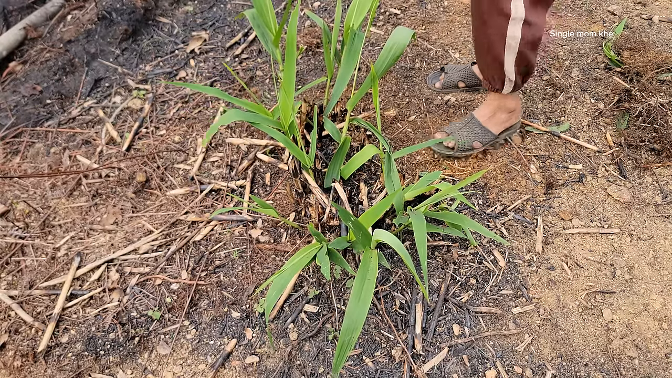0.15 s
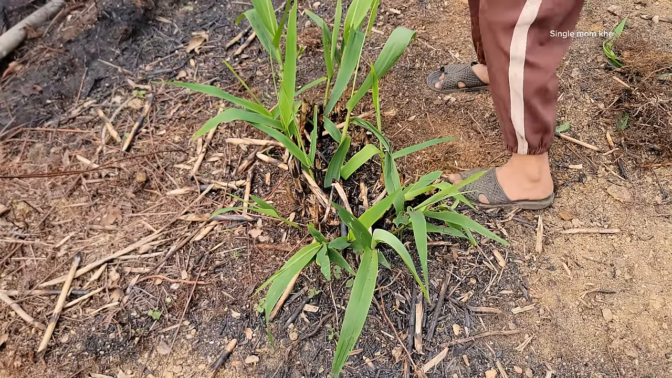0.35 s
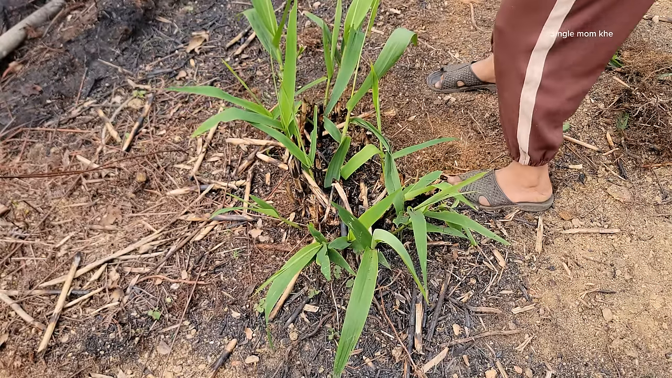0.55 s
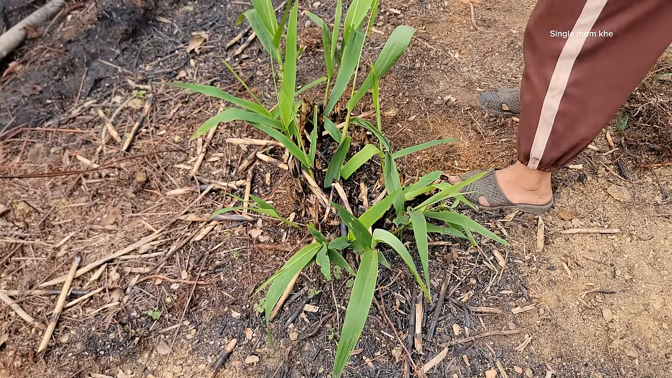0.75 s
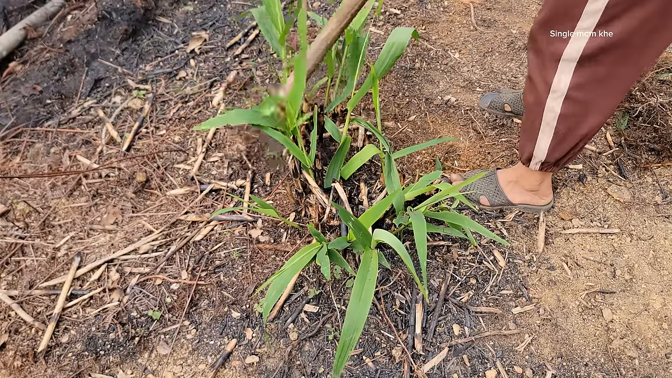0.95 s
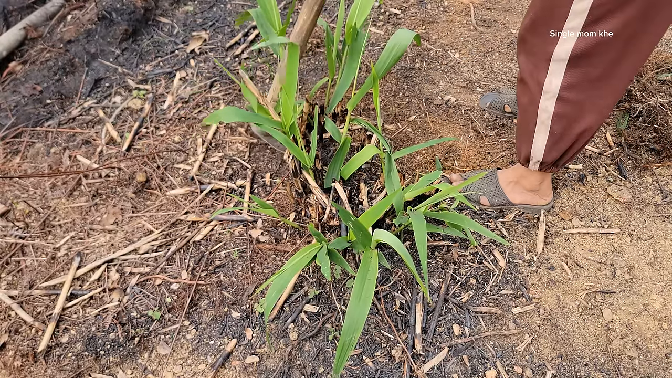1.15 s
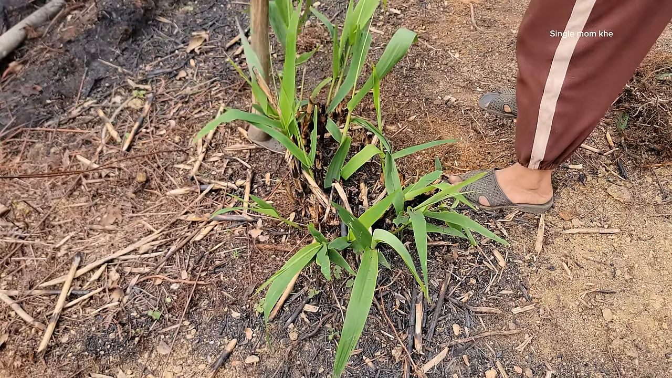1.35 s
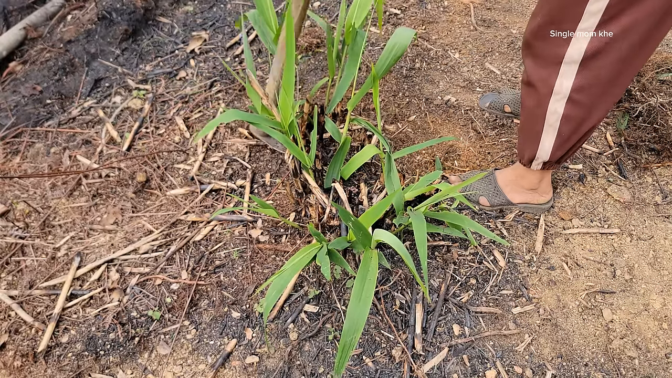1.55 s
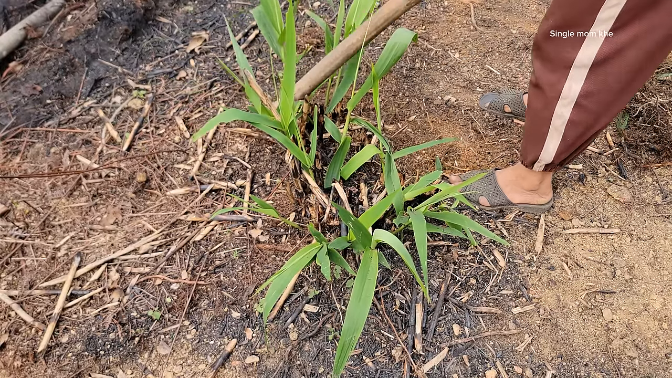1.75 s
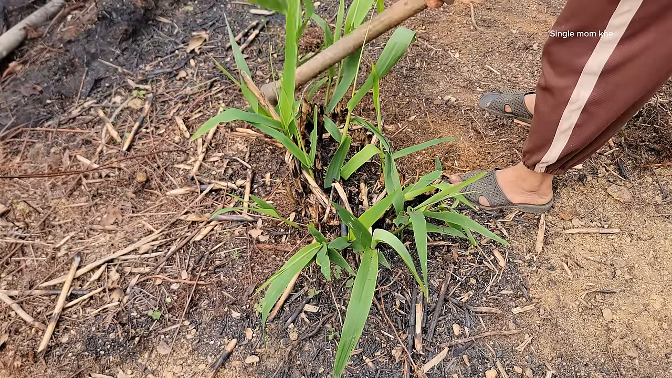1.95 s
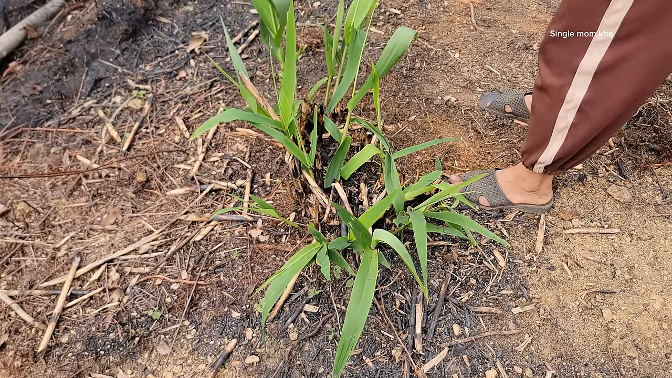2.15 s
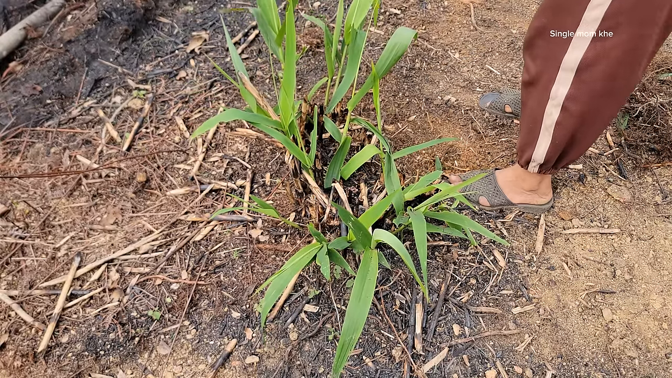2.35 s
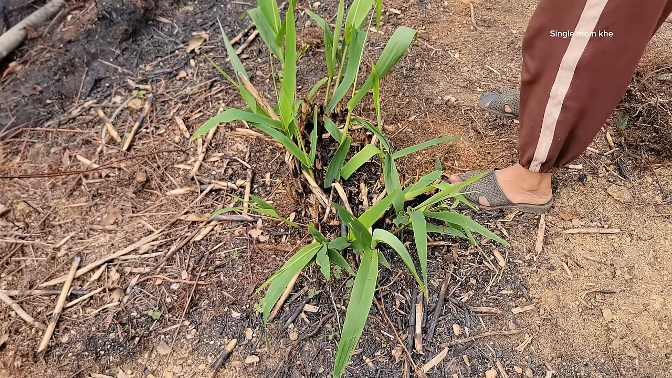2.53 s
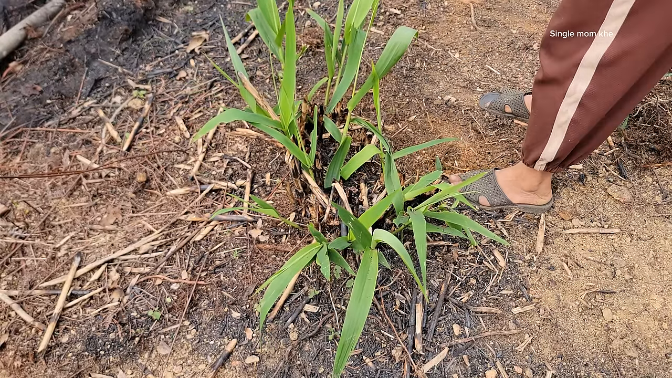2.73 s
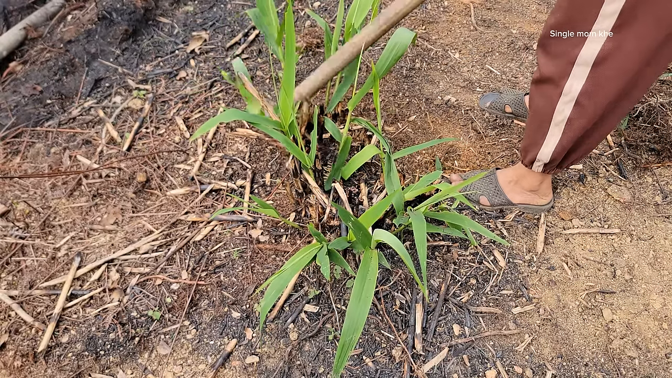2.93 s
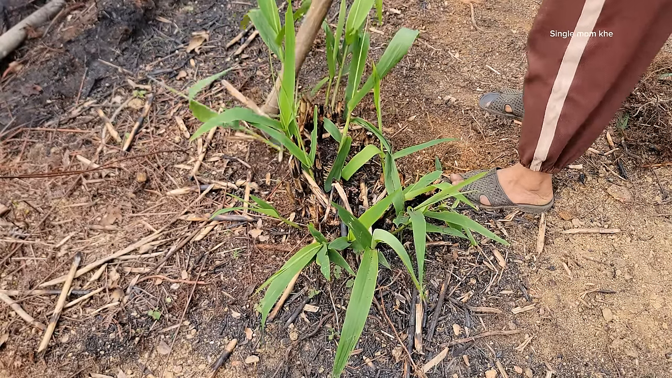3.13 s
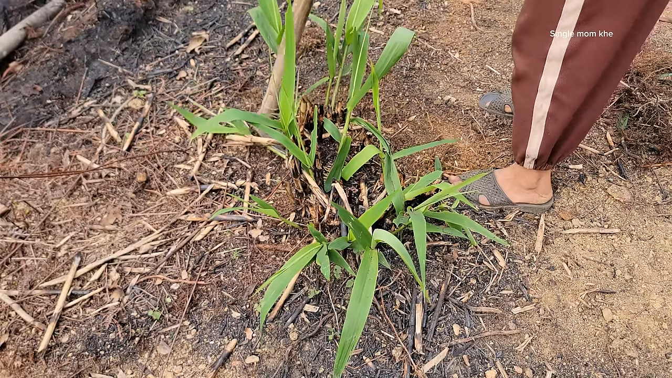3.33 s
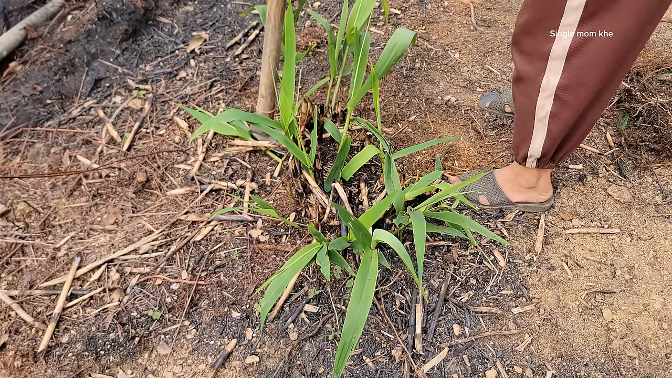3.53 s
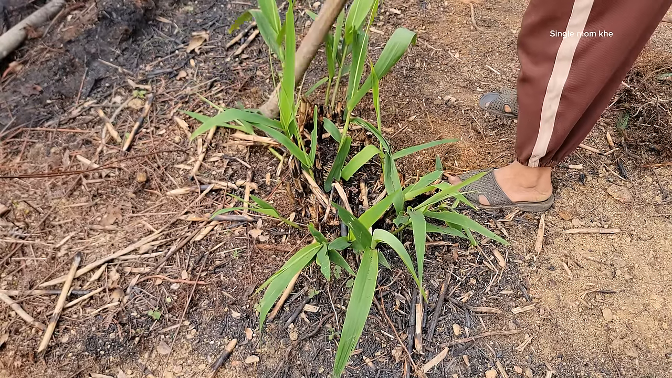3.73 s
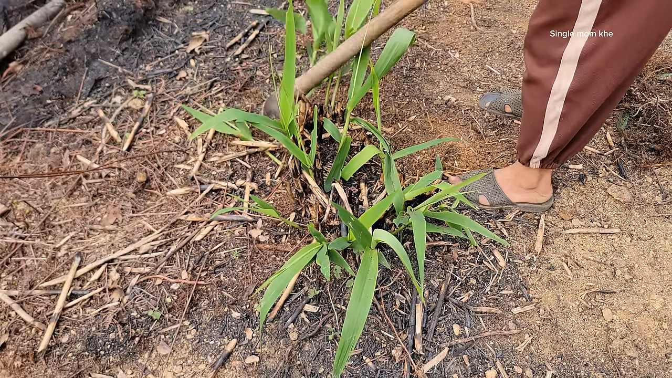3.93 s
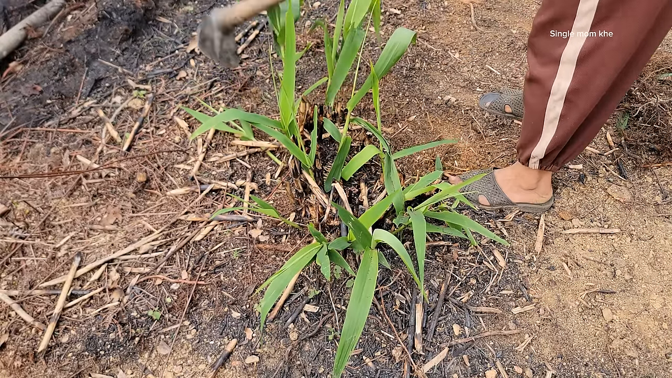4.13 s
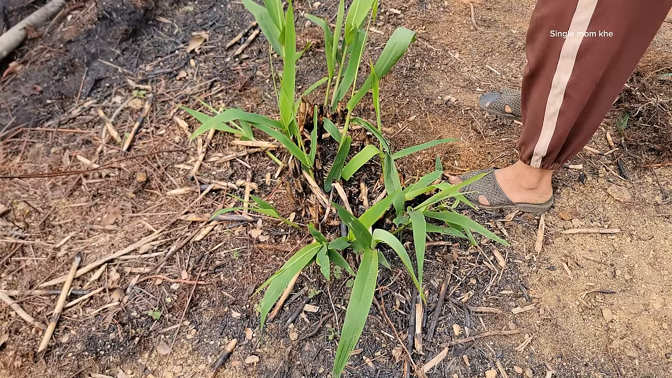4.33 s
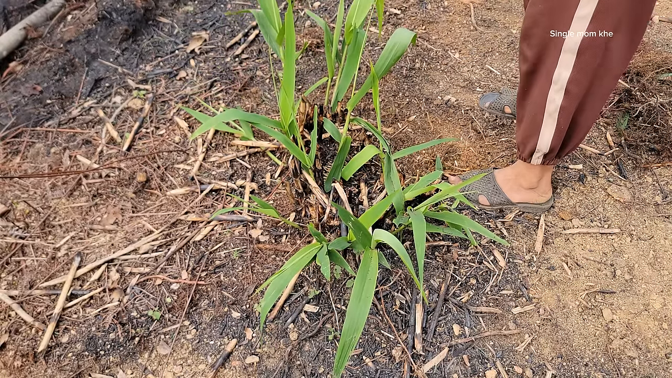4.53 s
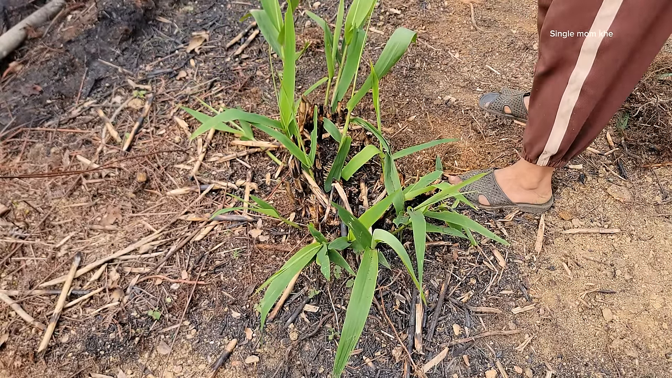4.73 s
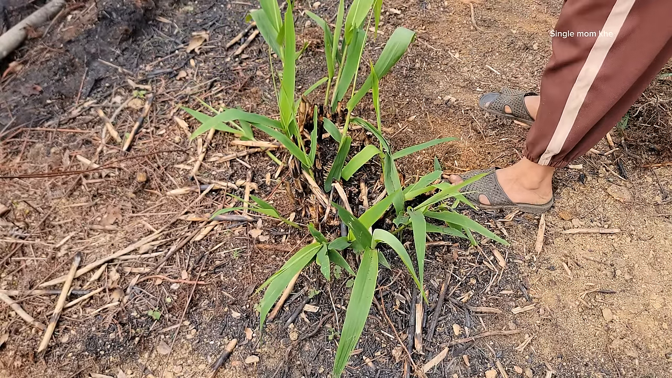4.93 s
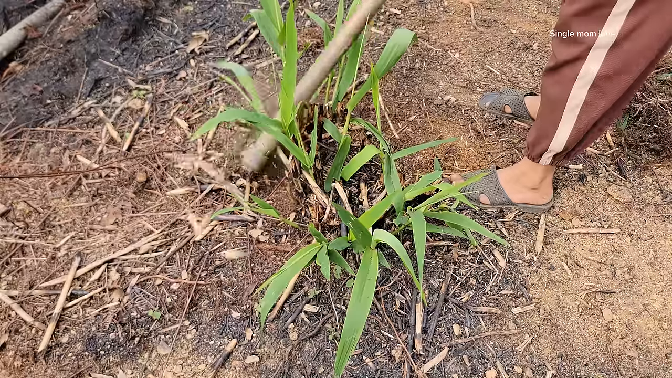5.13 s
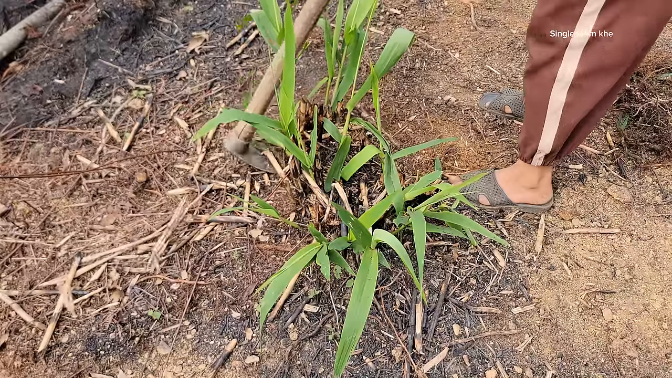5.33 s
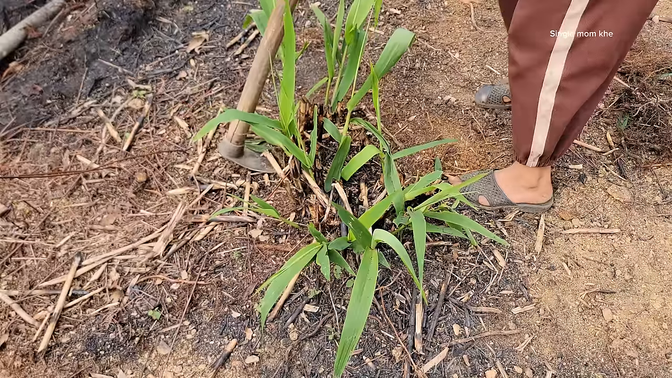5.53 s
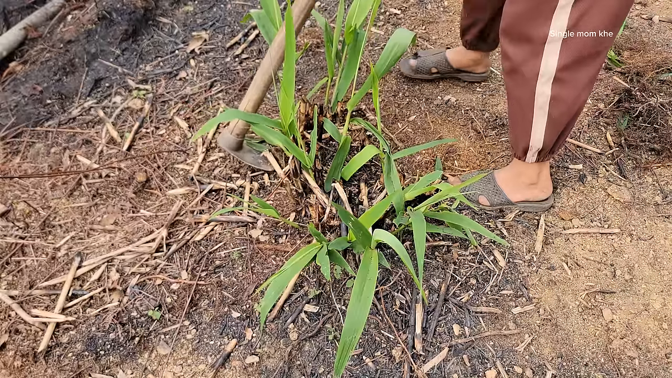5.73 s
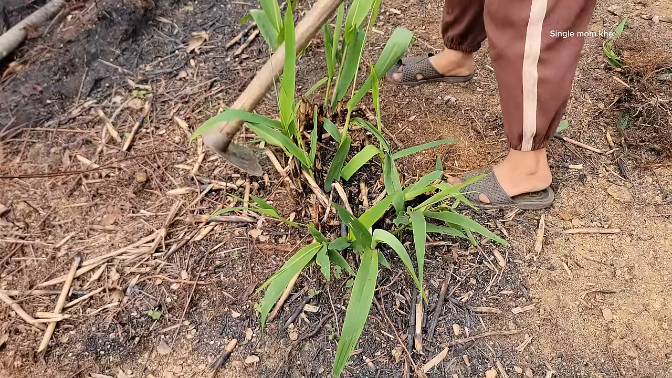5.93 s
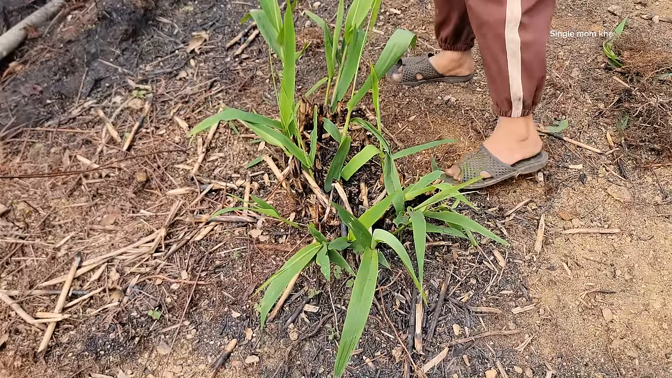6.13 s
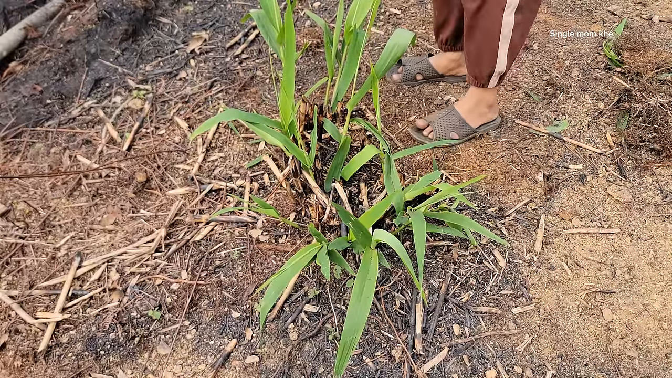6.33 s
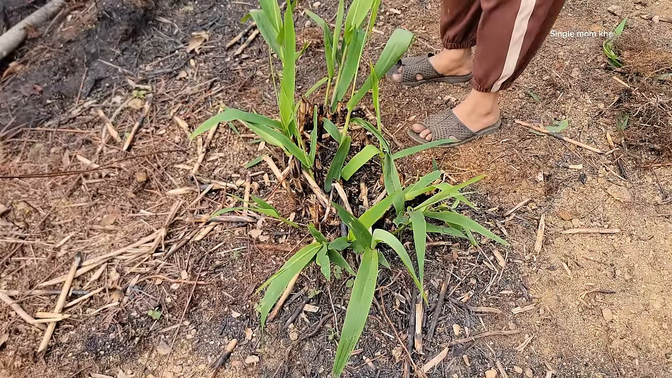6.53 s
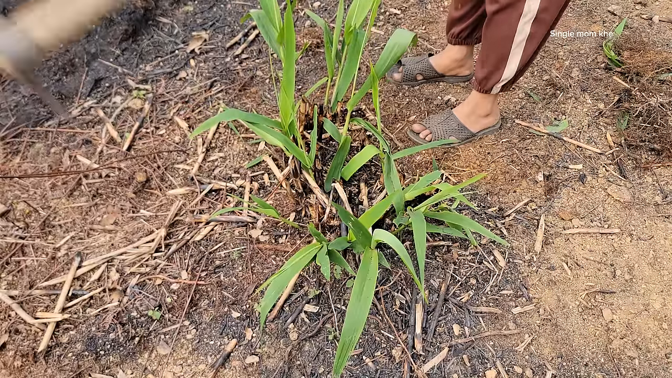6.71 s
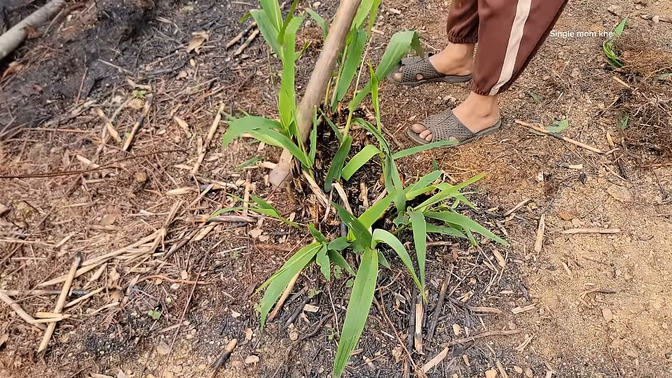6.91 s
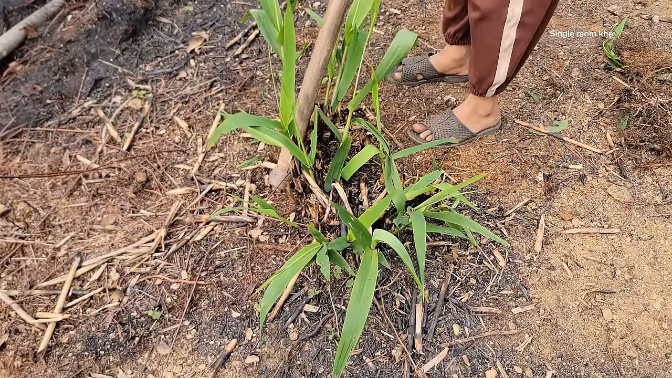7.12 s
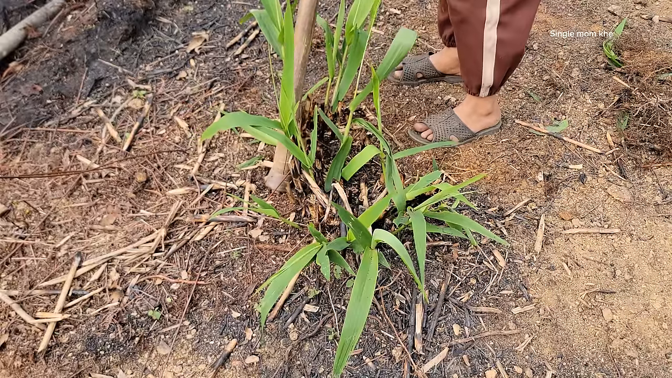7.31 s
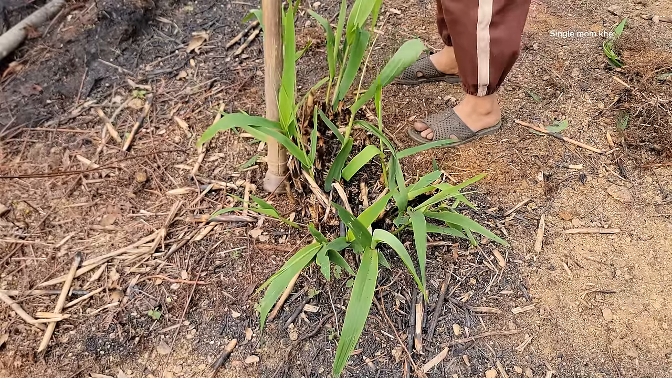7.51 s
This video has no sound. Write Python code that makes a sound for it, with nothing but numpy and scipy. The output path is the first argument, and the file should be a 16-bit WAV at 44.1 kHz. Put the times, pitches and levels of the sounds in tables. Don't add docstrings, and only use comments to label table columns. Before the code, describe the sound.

A hoe chops dry, twiggy soil four times about two seconds apart, crumbs pattering and leaves rustling between blows, while a cicada buzzes and chicks peep.

```python
import sys
import numpy as np
from scipy import signal
from scipy.fft import rfft, irfft, next_fast_len
from scipy.io import wavfile

SR = 44100
rng = np.random.default_rng(int(sys.argv[2]) if len(sys.argv) > 2 else 0)


def nominal_scale(level):
    x = np.asarray(level, float) / 20
    return 10 ** x


def persist_wave(psi):
    counts = np.round(np.clip(psi, -1, 1) * 32767).astype(np.int16)
    wavfile.write(sys.argv[1], SR, np.atleast_2d(counts).T)


N = 333837

LEFT_RIGHT = np.array([[.5], [-.5]])


def rms_one(x):
    return x / np.sqrt(np.mean(np.abs(x) ** 2) + 1e-20)


def at_hz(points, hz):
    table_hz, values = np.transpose(points)
    return np.interp(np.log(hz + 1), np.log(table_hz), values)


def colour(x, spectrum):
    size = next_fast_len(N)
    gain = nominal_scale(at_hz(spectrum, np.fft.rfftfreq(size, 1 / SR)))
    return rms_one(irfft(rfft(x, size) * gain, size)[..., :N])


def low_cut(x, hz):
    return signal.sosfilt(signal.butter(2, hz, "high", fs=SR, output="sos"), x)


def drift(rate):
    knots = rng.standard_normal(int(N / SR * 200) + 2)
    return np.interp(np.arange(N) / SR * rate, np.arange(len(knots)), knots)


def ring(x, hz, t60):
    r, w = nominal_scale(-60 / (t60 * SR)), 2 * np.pi * hz / SR
    return signal.lfilter([0, np.sin(w)], [1, -2 * r * np.cos(w), r * r], x + 1e-18)


def add(track, s, sound):
    at = round(s * SR)
    track[..., at:at + sound.shape[-1]] += sound[..., :N - at]


def ports(x, lag):
    size = next_fast_len(N)
    turn = np.exp(-1j * np.pi * lag * np.arange(size // 2 + 1) / size * np.array([[1], [-1]]))
    return irfft(rfft(x, size) * turn, size)[:, :N]


def grit(shape, spread_db):
    return rng.standard_normal(shape) * nominal_scale(spread_db * np.minimum(rng.exponential(1, shape), 4))


def crackle(rows, cycles, own, own_hiss, longest_s):
    lift_db, hiss_pan_db = 6, 2.4
    out, t = np.zeros((2, N)), np.arange(round(longest_s * SR)) / SR
    grains = grit((len(rows), 3, len(t)), spread_db=1.0)
    above = signal.butter(2, 4200, "high", fs=SR, output="sos")
    below = signal.butter(1, 11000, fs=SR, output="sos")
    hiss_band = np.vstack([above, below])
    for (s, peak_db, hz, treble_db, t60, pan_db), (both, *each) in zip(rows, grains):
        shape = np.minimum(t / .0003, 1) * nominal_scale(-60 * t / t60)
        body = low_cut(ring((both + own * np.array(each)) * shape, hz, cycles / hz), .3 * hz)
        hiss = signal.sosfilt(hiss_band, (both + own_hiss * np.array(each)) * shape)
        hiss_gain = nominal_scale(treble_db + lift_db + hiss_pan_db * LEFT_RIGHT)
        sound = rms_one(body) + hiss_gain * rms_one(hiss)
        add(out, s, nominal_scale(peak_db + pan_db * LEFT_RIGHT) * sound / np.abs(sound).max())
    return out


def blows(rows, push_cycles):
    out = np.zeros(N)
    for s, peak_db, hz, t60 in rows:
        u = np.arange(6000) / SR * hz / push_cycles
        push = -np.sin(np.pi * np.minimum(u, 1)) ** 2
        sound = ring(push, hz, t60)
        add(out, s, nominal_scale(peak_db) * sound / np.abs(sound).max())
    return out


def chops():
    # crack in seconds, peak in dB, grit pitch in Hz, treble in dB.
    blade_cracks = [(0.829, 0.5, 2900, -1.5), (.833, -6, 2530, -6.5), (0.8364, -4, 5976, -8.5),
                    (0.8389, -13, 1907, -1.5), (0.8446, -11.5, 2970, 3.5), (2.9236, -22.5, 3080, -10.5),
                    (2.9257, -9.5, 3018, -7.5), (2.9274, -5.5, 4602, -14.5), (2.929, -7, 1446, -5),
                    (5.003, -4.5, 2930, -3), (5.0072, -2.5, 4240, -6), (5.0584, -24.5, 1953, -1.5),
                    (5.066, -20, 4770, -12), (6.744, -37, 4000, -8.5), (6.7585, -17, 1900, -1),
                    (6.774, -15, 3000, -10), (6.7777, -4.5, 3070, -6), (6.7799, -12.5, 1300, -3.5),
                    (6.7824, -5.5, 6660, -9.5)]
    # start in seconds, peak in dB, grit pitch in Hz,
    # treble in dB, fall by 60 dB in seconds.
    soil_slides = [(2.935, -18.5, 3050, -1.5, 0.07), (5.0149, -2, 3020, -10, 0.0044),
                   (5.016, -17, 3000, -2.5, 0.13), (5.054, -33, 4530, -13, 0.082),
                   (6.769, -26.5, 2500, -10, 0.082), (6.784, -26.5, 2470, 13, 0.12)]
    crack_t60_s, blade_pan_db = 0.028, -1.6
    breaks = [(*row, crack_t60_s, blade_pan_db) for row in blade_cracks]
    breaks += [(*row, blade_pan_db) for row in soil_slides]
    return nominal_scale(3) * crackle(breaks, cycles=4.0, own=.35, own_hiss=.9, longest_s=.09)


def hoe(crunch):
    # pitch in Hz, level in dB, fall by 60 dB in seconds.
    hoe_tones = [(250, -18, 0.027), (520, -46, 0.059), (685, -28, 0.0089), (1350, -29.5, 0.0078),
                 (1904, -44, 0.011)]
    shake = crunch.mean(axis=0)
    return sum(nominal_scale(level_db) * ring(shake, hz, t60) for hz, level_db, t60 in hoe_tones)


def thumps():
    # start in seconds, peak in dB, pitch in Hz, fall by 60 dB in seconds.
    ground_blows = [(.834, -19, 520, .03), (.839, -26, 264, 0.039), (.8445, -12, 132, 0.04),
                    (1.93, -47.5, 181, 0.042), (2.9275, -14, 520, 0.036), (2.929, -20, 250, 0.045),
                    (2.9291, -20.5, 760, .025), (2.932, -9.5, 100, 0.043), (2.957, -30, 102, 0.09),
                    (4.645, -61, 210, .04), (4.69, -57, 221, .04), (4.5, -41, 76.5, 0.08),
                    (5.008, -17.5, 250, 0.037), (5.0081, -19.5, 520, .03), (5.009, -19, 730, 0.027),
                    (5.0095, -14.5, 127, 0.056), (5.021, -42.5, 120, .06), (6.779, -18, 218, 0.047),
                    (6.7791, -13.5, 765, .025), (6.7855, -17, 117.2, 0.049)]
    return low_cut(blows(ground_blows, push_cycles=.4), 65)


def snaps():
    # start in seconds, peak in dB, grit pitch in Hz.
    twigs = [(0.964, -32.5, 3620), (1.251, -39.5, 2400), (1.324, -34.5, 2430), (1.672, -37, 1900),
             (1.909, -35.5, 1240), (1.943, -30, 4060), (3.238, -46, 1390), (4.001, -30, 3020),
             (5.146, -36.5, 4170), (5.241, -40, 2800), (5.782, -36.5, 1280), (6.588, -50.5, 1500),
             (7.227, -34.5, 3630), (7.535, -34.5, 4370)]
    # start in seconds, peak in dB, grit pitch in
    # Hz.
    clods_and_crumbs = [(0.908, -42, 1540), (1.01, -26.5, 2340), (1.056, -40.5, 4330), (1.299, -41.5, 2760),
                        (1.74, -29, 4170), (2.015, -31, 4660), (2.159, -46, 4100), (2.865, -43.5, 4300),
                        (3.466, -44.5, 2353), (3.915, -45.5, 1350), (3.947, -38.5, 3220), (5.365, -29.5, 4690),
                        (5.815, -40.5, 2890), (5.93, -35, 3340), (6.324, -42.5, 2410), (6.981, -41.5, 4460),
                        (7.331, -36, 1010), (7.501, -25, 3100), (7.516, -34, 850),
                        (.668, -58, 1900), (.916, -44, 3000), (.94, -53, 2000), (1.074, -49, 2500),
                      (1.108, -50.5, 1980), (1.138, -51, 3000), (1.181, -49, 3500), (1.193, -46, 2500),
                      (1.22, -44, 1510), (1.231, -46, 1500), (1.348, -47, 1790), (1.591, -49, 2600),
                      (1.84, -51, 3530), (1.875, -40, 3900), (1.925, -41, 1900), (1.932, -42, 3000),
                      (1.95, -37, 2700), (2.057, -49, 2970), (2.189, -50, 1800), (2.622, -54, 880),
                      (2.665, -59, 800), (3.365, -56.5, 1300), (3.56, -53, 3300), (3.877, -44, 2880),
                      (4.03, -43, 1800), (4.643, -46, 2500), (4.689, -46.5, 2620), (5.095, -42.5, 3000),
                      (5.118, -41, 1514), (5.327, -50, 1800), (5.342, -55, 2200), (5.398, -57, 1700),
                      (5.99, -53.5, 3310), (6.042, -50, 3500), (6.28, -49.5, 1490), (6.3, -48, 1360),
                      (6.388, -56, 1800), (6.404, -54, 1800), (7.113, -54, 1790), (7.264, -48.5, 2900),
                      (7.401, -46, 1400), (7.459, -51.5, 1220)]
    # start in seconds, peak in dB.
    ticks = [(.397, -35.5), (0.5, -41), (1.264, -30), (1.1, -33), (1.348, -33.5), (2.016, -36),
             (2.863, -44), (3.256, -43), (4.53, -57), (4.913, -50.5), (5.254, -34), (5.327, -32),
             (5.343, -29.5), (5.364, -27), (5.465, -40), (5.604, -41.5), (6.554, -57), (7.185, -41)]
    twig_treble_db, clod_treble_db = -8.5, -58
    tick_hz, tick_treble_db = 1400, 23
    t60_s = 0.0157
    small = [(*row, twig_treble_db) for row in twigs]
    small += [(*row, clod_treble_db) for row in clods_and_crumbs]
    small += [(*row, tick_hz, tick_treble_db) for row in ticks]
    pans_db = rng.normal(-1, 2, len(small))
    rows = [(*row, t60_s, pan_db) for row, pan_db in zip(small, pans_db)]
    return crackle(rows, cycles=3.0, own=.3, own_hiss=.8, longest_s=.025)


def swells(rows):
    swell_db = 20
    t = np.arange(0, N / SR + .004, .002)
    power = 0
    for s, db, rise, fall in rows:
        away = np.where(t < s, (s - t) / rise, (t - s) / fall)
        power = power + nominal_scale(db - swell_db * away) ** 2
    return np.interp(np.arange(N) / SR, t, 10 * np.log10(power + 1e-13))


def crumbs(pitches_hz, gains_db, per_s, cycles, clumps_db):
    born = grit(N, spread_db=3.0) * (rng.random(N) < per_s / SR) * nominal_scale(clumps_db)
    dealt = rng.integers(0, len(pitches_hz), N)
    placed = born * nominal_scale(rng.normal(0, 4, N) * LEFT_RIGHT)
    out = np.zeros((2, N))
    for k, (hz, gain_db) in enumerate(zip(pitches_hz, gains_db)):
        patches = nominal_scale(gain_db + 4.5 * drift(11))
        out += ring(placed * ((dealt == k) * patches), hz, cycles / hz)
    return rms_one(low_cut(out, .7 * pitches_hz[0]))


def rustle():
    # start in seconds, crumble in dB, leaves over crumble in dB,
    # seconds to fall away.
    showers = [
        (.87, -55, -1.5, 0.35),
        (2.96, -56, -4.5, 0.14),
        (3.019, -65, -3.5, 0.51),
        (5.08, -62.5, 0, 0.53),
        (6.808, -56.5, -2, 0.25),
    ]
    # peak time in seconds, crumble in dB,
    # leaves over crumble in dB, seconds to swell, seconds to fall away.
    plant_stirs = [(.16, -70, -6, 0.31, .25), (.36, -63, 1.5, 0.09, 0.11), (.74, -65.5, -17.5, 0.046, 0.24),
                   (1.33, -60.5, -6.5, 0.65, 0.038), (1.58, -66.5, -7.5, 0.16, 0.96),
                   (1.945, -45, -9.5, 0.12, 0.024), (2.0, -69.5, -4, .1, 0.44), (2.3, -70, 1.5, 0.13, .2),
                   (2.43, -68.5, -5.5, 0.21, 0.06), (2.868, -83, 14.5, .015, 0.031),
                   (3.45, -71.5, -5, 0.64, 0.071), (3.61, -67, -7, 0.1, 0.58),
                   (3.88, -59, -13, 0.075, 0.34), (4.02, -63.5, -3, 0.34, 0.15), (4.12, -81, 7.5, 0.12, .4),
                   (4.49, -69.5, -4.5, 0.25, 0.099), (4.67, -72.5, -18.5, 0.091, 0.061),
                   (5.13, -57.5, -3, 0.21, 0.049), (5.25, -55.5, 0, 0.047, 0.097),
                   (5.38, -63, 4, 0.115, 0.05), (5.57, -74, 1, 0.52, .5), (5.8, -61.5, -8, 0.041, 0.19),
                   (6.03, -74, -6.5, .15, 0.28), (6.32, -65.5, -10, 0.12, 0.12),
                   (7.24, -62.5, -6, 0.22, 0.33), (7.51, -58, -3, 0.077, 0.076)]
    # peak time in seconds, level in dB,
    # seconds to swell, seconds to fall away.
    ground_scuffs = [(.35, -61.5, 0.1, 0.029), (.76, -61.5, 0.036, 0.14), (1.71, -67.5, 0.073, 0.22),
                     (1.94, -64.5, 0.14, 0.055), (2.64, -69, .09, 0.14), (2.95, -47, 0.085, 0.058),
                     (4.02, -59, 0.21, 0.044), (4.4, -64.5, 0.071, .07), (4.67, -64, .13, 0.11),
                     (5.0, -53, 0.052, 0.067), (5.75, -59.5, 0.21, 0.29), (6.18, -57.5, 0.092, 0.089),
                     (6.54, -64, 0.17, .1), (6.76, -62.5, 0.098, 0.32), (7.5, -60, 0.32, 0.13)]
    # pitch in Hz, level per grain in dB.
    dull_spectrum = [(900, -18.5), (1300, -12.5), (2500, -7.5), (4300, 0), (6000, -5), (8500, -10.5)]
    # frequency in Hz, level per Hz in dB.
    crisp_spectrum = [(4500, -13), (7000, 7.5), (9000, -0.5), (12000, -2), (15500, -1), (16500, -25)]
    shower_rise_s = 0.095
    stirs = [*plant_stirs]
    stirs += [(s, db, leaf_db, shower_rise_s, fall) for s, db, leaf_db, fall in showers]
    scuff_db = swells(ground_scuffs)
    crumble_db = swells([(s, db, rise, fall) for s, db, _, rise, fall in stirs])
    crisp_db = swells([(s, db + leaf_db, rise, fall) for s, db, leaf_db, rise, fall in stirs])

    clumps_db = 2.0 * drift(30) + 1.5 * drift(140)
    scuff_hz = np.geomspace(500, 980, num=4)
    scuff = crumbs(scuff_hz, np.zeros(4), per_s=2500, cycles=20, clumps_db=clumps_db)
    crumble_hz = np.geomspace(950, 8300, num=14)
    grain_db = at_hz(dull_spectrum, crumble_hz)
    crumble = crumbs(crumble_hz, grain_db, per_s=12000, cycles=24, clumps_db=clumps_db)
    leaves = grit(N, spread_db=-2.0) + 2.1 * grit((2, N), spread_db=6.0)
    crisp = colour(leaves * nominal_scale(clumps_db), crisp_spectrum)
    return nominal_scale(scuff_db - 3.0) * scuff + nominal_scale(crumble_db + 5.0) * crumble + nominal_scale(crisp_db + 6.5) * crisp


def rasps():
    # start in seconds, length in seconds, pitch in Hz, width in Hz, level in dB.
    rubs = [(0.197, .035, 1800, 200, -70.5), (0.707, 0.081, 1660, 403, -61.5),
            (2.269, 0.083, 3300, 300, -68), (2.384, 0.083, 2830, 500, -65.5), (3.841, .07, 4280, 290, -63),
            (4.146, 0.049, 3920, 350, -62.5), (4.412, 0.14, 2820, 250, -69), (5.218, 0.043, 2800, 250, -62),
            (6.873, .17, 7250, 150, -63), (7.198, .06, 1110, 250, -68)]
    out = np.zeros(N)
    for (s, length, hz, width_hz, level_db), grains in zip(rubs, grit((len(rubs), 9000), spread_db=3.0)):
        count = round(length * SR)
        rub = grains[:count] * np.hanning(count) ** .5
        rasp = ring(ring(rub, hz, 2.2 / width_hz), hz, 1.1 / width_hz)
        add(out, s, nominal_scale(level_db) * rms_one(rasp))
    return out


def phrases():
    # start in seconds, end in seconds, level in dB.
    buzzes = [
        (-1.0, 2.44, -53.5),
        (2.7, 4.41, -53.5),
        (4.68, 6.33, -54.5),
        (6.64, 9.0, -53.5),
    ]
    slack_hz, taut_hz, sag_hz = 4230, 5540, 170
    wind_wait_s, wind_up_s = .23, .46
    open_wait_s, open_s = .06, .12
    slack_loss_db, onset_db_per_s, onset_s = 1.5, 112.5, 0.19
    tire_s, tire_db, stop_db_per_s = 0.11, 22, 158.5
    t = np.arange(N) / SR
    rows = np.array(buzzes)
    pauses = (rows[:-1, 1] + rows[1:, 0]) / 2
    start, end, level_db = rows[np.searchsorted(pauses, t)].T

    opened = np.clip((t - start - open_wait_s) / open_s, 0, 1)
    wound = np.sin(np.pi / 2 * np.clip((t - start - wind_wait_s) / wind_up_s, 0, 1)) ** 2
    tired = np.clip(1 - (end - t) / tire_s, 0, 1)
    level_db = level_db - slack_loss_db * (1 - wound) - tire_db * tired ** 2
    level_db -= onset_db_per_s * np.maximum(start + onset_s - t, 0)
    level_db -= stop_db_per_s * np.maximum(t - end, 0)
    drum_hz = slack_hz + (taut_hz - slack_hz) * wound - sag_hz * tired
    return drum_hz, level_db, opened, wound


def cicada():
    # share of drum pitch, half width in Hz, level in dB, steadiness.
    drum_parts = [(.985, 90, -1, 1.8), (1.0, 330, -1, .5), (1.115, 330, -1.5, .5)]
    pulses_per_s = 102
    drum_hz, level_db, opened, wound = phrases()
    beats = np.cumsum(pulses_per_s * (1 + .004 * drift(3))) / SR
    steady = rms_one(np.diff(np.floor(beats), prepend=0))
    blur, flutter = .004 + .15 * wound * (1 - wound), drift(190)
    out = np.zeros((2, N))
    for k, (share, width_hz, part_db, steadiness) in enumerate(drum_parts):
        uneven = rng.standard_normal((3, N)) + 1j * rng.standard_normal((3, N))
        narrowing_db = 9 * k * (1 - opened) + 1.2 * k * (1 - wound)
        spread = .04 * min(k, 1) * opened * (1 - wound)
        band = signal.butter(2, width_hz, fs=SR, output="sos")
        swing = signal.sosfilt(band, steadiness * steady + uneven[0] + .5 * uneven[1:])
        part_hz = share * drum_hz * (1 + (blur + spread) * flutter)
        tone = np.exp(2j * np.pi * np.cumsum(part_hz) / SR)
        out += nominal_scale(part_db - narrowing_db) * np.real(rms_one(swing) * tone)
    return nominal_scale(level_db) * rms_one(out)


def birds():
    # start in seconds, length in seconds, start pitch in Hz, level in dB.
    peeps = [(0.001, 0.028, 3680, -77), (0.085, 0.074, 4530, -68), (0.215, 0.061, 4600, -69),
             (.37, 0.048, 4540, -70), (0.48, 0.11, 4200, -74), (0.612, 0.046, 4380, -74),
             (.73, .04, 4000, -80), (1.39, 0.065, 4440, -75), (2.495, 0.053, 4500, -73.5),
             (3.335, 0.1, 3480, -77), (3.72, 0.047, 4200, -73), (3.745, 0.043, 4350, -73),
             (4.18, 0.1, 4320, -67.5), (4.295, 0.067, 4200, -74), (4.385, .045, 3810, -80),
             (4.53, 0.1, 4650, -74), (5.447, 0.078, 3560, -66), (5.665, 0.043, 4200, -72),
             (5.71, 0.054, 4450, -80), (6.40, 0.1, 4400, -69.5), (6.42, .05, 4150, -72),
             (6.55, 0.045, 4160, -70), (6.575, 0.1, 4500, -69), (6.60, 0.069, 4230, -70.5),
             (6.645, .07, 4200, -73), (6.68, 0.058, 4450, -72.5), (6.97, .05, 4200, -74),
             (7.055, 0.055, 4250, -68), (7.09, 0.045, 4350, -72.5)]
    # start in seconds, length in seconds, start pitch in Hz, level in dB.
    chirps = [(0.145, 0.082, 4200, -77), (.465, 0.035, 3900, -78), (3.48, 0.058, 3800, -86),
              (3.814, .04, 4420, -81), (4.47, 0.07, 4950, -79), (4.65, .04, 4700, -89),
              (5.402, 0.071, 4700, -56), (5.51, 0.093, 4600, -70), (5.615, .06, 3650, -72),
              (7.14, 0.1, 4420, -58), (7.33, 0.072, 4400, -75.5), (7.44, .06, 3400, -74)]
    # start in seconds, length in seconds, start pitch in Hz, level in dB.
    dove = [(3.95, 0.19, 1118, -61)]
    tweets = [.095, .24, .39, .56, .70, 7.11, 7.275, 7.42]
    calls = [(*row, .37, 1.9) for row in peeps]
    calls += [(*row, .18, 1.3) for row in chirps]
    calls += [(*row, .014, 1.3) for row in dove]
    calls += [(s, .085, 5400, -70, -.48, .2) for s in tweets]
    out = np.zeros(N)
    for s, length, start_hz, level_db, fall, bend in calls:
        u = np.linspace(0, 1, round(length * SR))
        phase = 2 * np.pi * np.cumsum(start_hz * (1 - fall * u ** bend)) / SR
        whistle = np.sin(phase) + .08 * np.sin(2 * phase)
        add(out, s, nominal_scale(level_db + 3) * np.sin(np.pi * u) ** .6 * whistle)
    out *= nominal_scale(3.5 * drift(70) - 2.5)
    echo = .4 * np.roll(out, 380) + .3 * np.roll(out, 900) + .2 * np.roll(out, 1500)
    return 1.3 * out + echo


def hen_knocks():
    # start in seconds, peak in dB, pitch in Hz, fall by 60 dB in seconds.
    yard_knocks = [(0.163, -49.5, 1350, 0.045), (2.304, -53, 566, 0.031), (2.618, -52, 585, 0.045),
                   (4.388, -60.5, 619, 0.02), (4.434, -56.5, 650, 0.03), (4.549, -51, 558, 0.052),
                   (4.644, -36.5, 562, 0.033), (4.689, -39.5, 564, 0.036), (5.649, -52, 723, 0.023),
                   (5.699, -60, 557, 0.042), (6.17, -53.5, 623, 0.025), (6.198, -50, 591, 0.024),
                   (6.549, -52, 603, 0.032), (7.5, -27, 543, 0.012)]
    return low_cut(blows(yard_knocks, push_cycles=0.85), 300)


def background():
    # time in seconds, wind in dB, motor hum in dB; at 4.95 and 6.72 s the hoe's swing before the blow
    lows = [(0.0, -68.5, -83), (0.51, -62.5, -102), (0.78, -53.5, -81), (0.93, -53.5, -84),
            (1.13, -59.5, -93.5), (1.44, -62, -74), (1.61, -72.5, -69.5), (2.73, -67, -62),
            (3.71, -80, -65.5), (4.66, -76.5, -65.5), (4.95, -54.5, -60.5), (5.25, -73.5, -70),
            (5.85, -73, -64), (6.15, -59.5, -63.5), (6.52, -65, -68), (6.72, -57, -55),
            (7.11, -60.5, -87.5), (7.57, -72, -66)]
    # frequency in Hz, level per Hz in dB.
    wind_spectrum = [(15, -5.5), (35, -8.5), (60, -5.5), (110, -12.5), (170, -40), (300, -54.5)]
    # frequency in Hz, level per Hz in dB.
    air_spectrum = [(100, -13), (140, -8.5), (200, -23), (285, -12.5), (390, -25), (540, -15.5),
                    (750, -32.5), (1600, -33), (3000, -29), (4700, -24.5), (6900, -30.5), (8300, -21.5),
                    (9000, -45), (12000, -66)]
    # frequency in Hz, left-right likeness from 0 to 1.
    likeness = [(60, .94), (300, .66), (1400, .4), (3100, .2), (8000, 0)]
    air_db, hum_hz = -70, 93
    s, wind_points, hum_points = np.transpose(lows)
    t = np.arange(N) / SR
    wind_db, hum_db = np.interp(t, s, wind_points), np.interp(t, s, hum_points)

    size = next_fast_len(N)
    alike = at_hz(likeness, np.fft.rfftfreq(size, 1 / SR))
    mid, side = rfft(rng.standard_normal((2, size)))
    both = np.sqrt(1 + alike) * mid + np.sqrt(1 - alike) * side * [[1], [-1]]
    even = colour(irfft(both, size)[:, :N], air_spectrum)
    bright = low_cut(even, 900)
    air = nominal_scale(air_db + 3.5 * drift(7.6)) * (even - bright)
    air += nominal_scale(air_db - 1.5 + 2.5 * drift(4.0)) * bright

    gusts = rng.standard_normal(N) + .55 * rng.standard_normal((2, N))
    lumps_db = 3.8 * drift(11)
    wind = nominal_scale(wind_db + 3.5 + lumps_db) * colour(gusts, wind_spectrum)

    turns = np.cumsum(hum_hz * (1 + 0.0084 * drift(8.6))) / SR
    hum = nominal_scale(hum_db + 1.0 + 2.3 * drift(17)) * np.sin(2 * np.pi * turns)
    return air + wind + hum


def scene():
    crunch = chops()
    work = crunch + hoe(crunch) + snaps() + rustle() + rasps()
    low = thumps() + hen_knocks()
    insect = cicada() * nominal_scale([[-1.5], [1.5]])
    near = ports(work, lag=-2.4) + ports(low, lag=-7)
    return near + ports(insect, lag=3.3) + ports(birds(), lag=2.2) + background()


def low_pass(x):
    return signal.sosfilt(signal.butter(12, 16800, fs=SR, output="sos"), x)


def record(dry):
    ground_dip_hz, bass_cut_hz, top_hz = 403, 30, 15700
    x = dry - .65 * signal.lfilter(*signal.iirpeak(ground_dip_hz, 3.0, SR), dry)
    x = low_cut(x, bass_cut_hz)
    x = 1.1 * np.tanh(x / 1.1)
    x = signal.sosfilt(signal.cheby1(10, 1, top_hz, fs=SR, output="sos"), x)
    return low_pass(x)


dry = scene()
out = record(dry)
persist_wave(out)
```